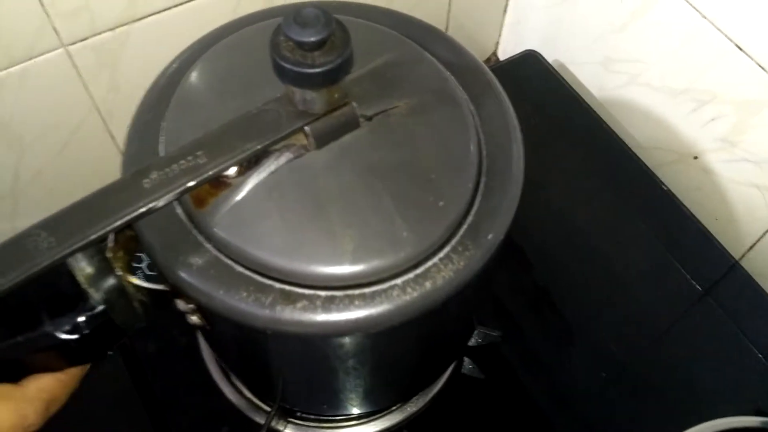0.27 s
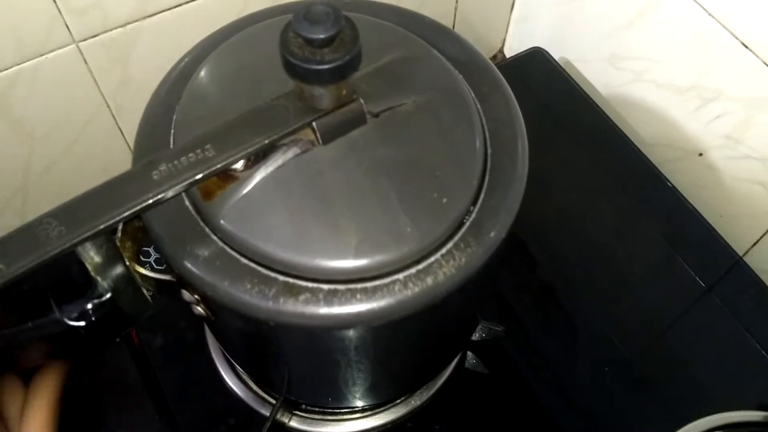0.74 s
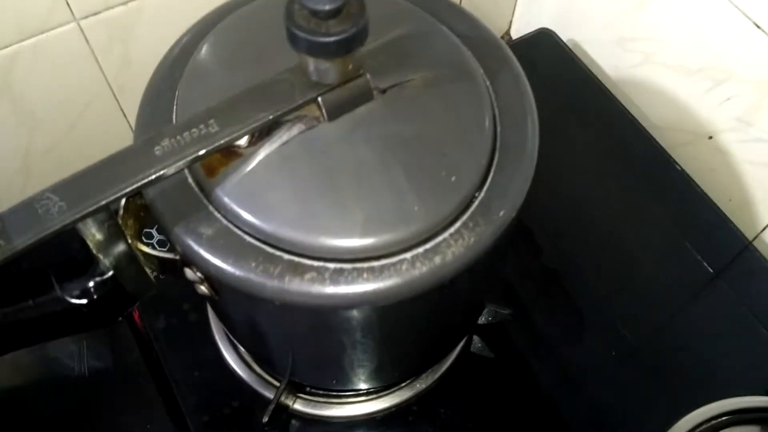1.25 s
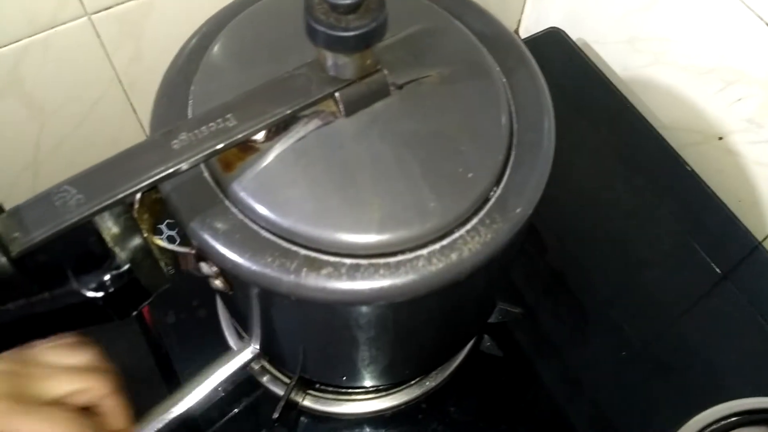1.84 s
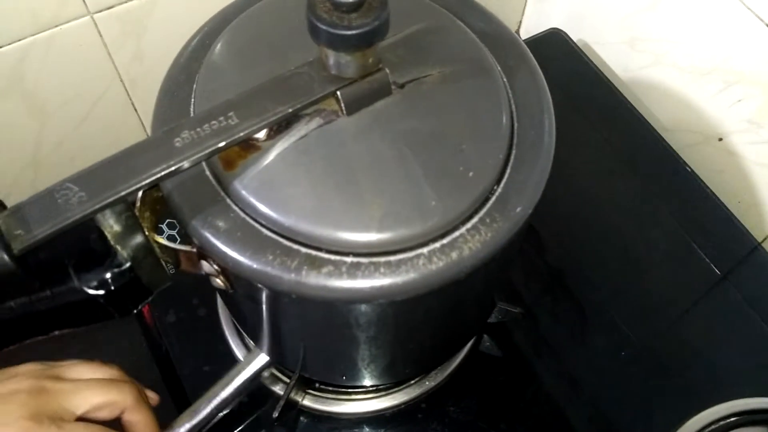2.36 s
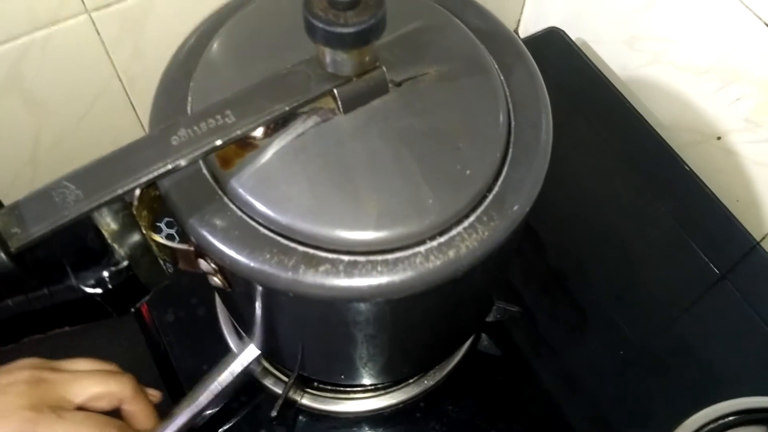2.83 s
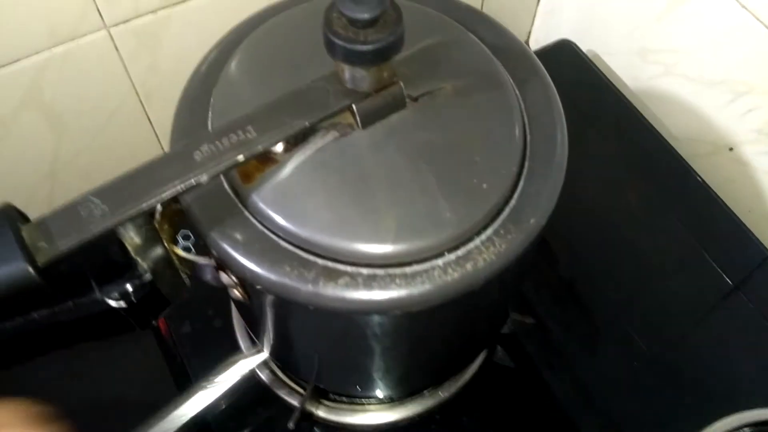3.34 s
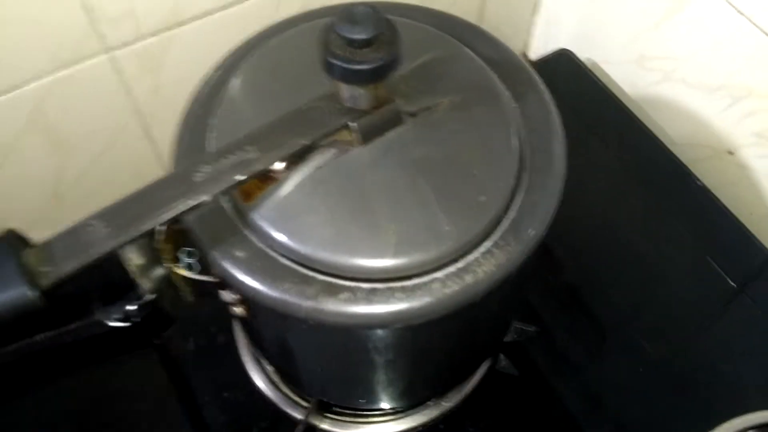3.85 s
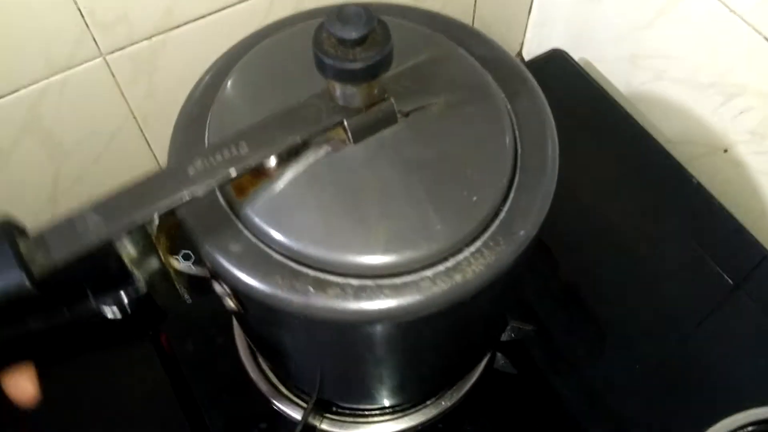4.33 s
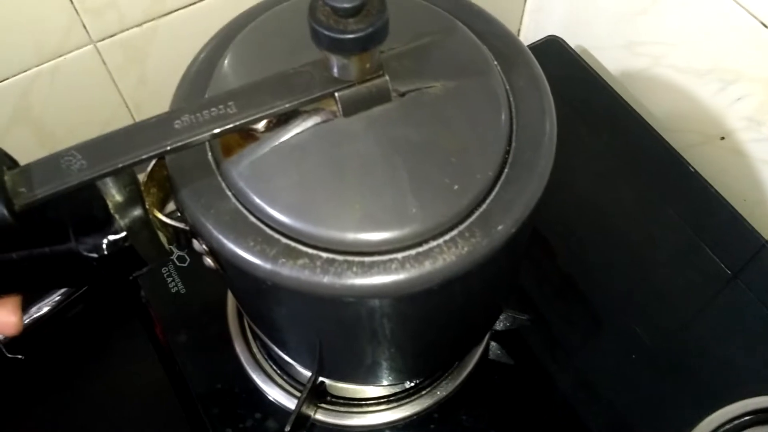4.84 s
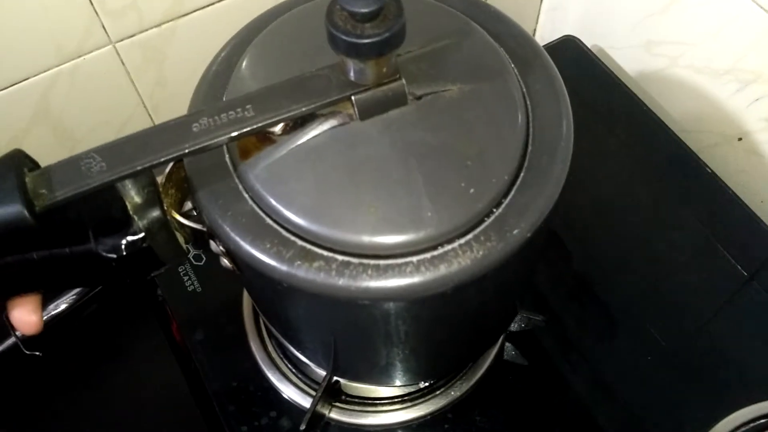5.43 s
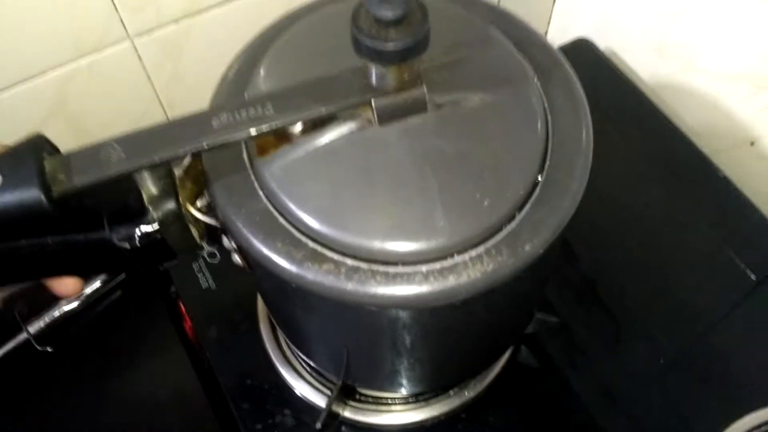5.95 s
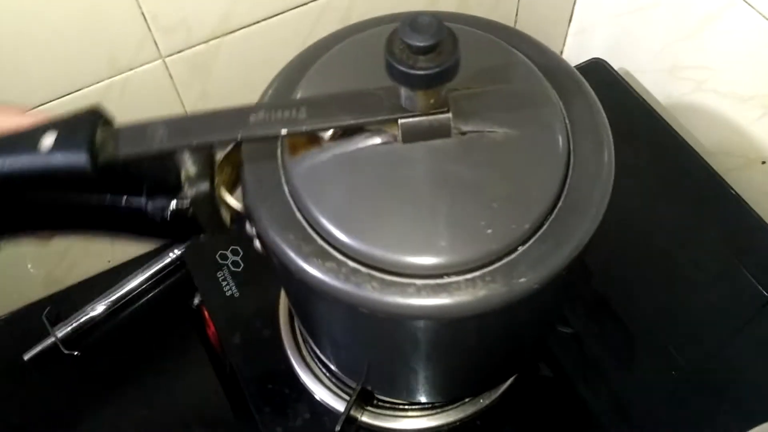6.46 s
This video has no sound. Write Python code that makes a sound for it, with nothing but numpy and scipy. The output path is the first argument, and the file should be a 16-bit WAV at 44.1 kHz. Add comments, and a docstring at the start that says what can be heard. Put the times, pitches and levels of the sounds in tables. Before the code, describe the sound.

A steel gas lighter clinks, snaps three times, lights a stove burner with a soft thump, then is set down with a clatter.

```python
"""A steel gas lighter is picked up, snapped three times under a pot on a stove, then laid down.
Each contact is a gritty crack that rings its tube; its wire ring ticks and fizzes.
The gas catches with a thump that shakes the hollow under the pot. The steel echoes in a small
tiled kitchen. Below lie a low room rumble, a murmur of the house and a faint hiss of gas."""
import sys
import numpy as np
from scipy import signal
from scipy.io import wavfile

SR = 44100
rng = np.random.default_rng(int(sys.argv[2]) if len(sys.argv) > 2 else 0)


def dump(signal):
    """Clip the signal to [-1, 1] and save it as 16-bit WAV at the path in sys.argv[1]."""
    limited = np.clip(np.atleast_2d(signal).T, -1, 1)
    pcm = np.round(limited * 32767).astype(np.int16)
    wavfile.write(sys.argv[1], SR, pcm)


N = 295029


def from_db(db):
    """Gain of a level in dB."""
    return 10 ** (np.asarray(db) / 20)


def unit_rms(x):
    """Scale to rms 1."""
    return x / np.sqrt(np.mean(x ** 2) + 1e-20)


def at_hz(table, hz, column=1):
    """Interpolate a table over log frequency."""
    table = np.array(table)
    return np.interp(np.log(hz), np.log(table[:, 0]), table[:, column])


def band(x, low_hz, high_hz, order=2):
    """Band-pass that keeps the rms of white noise."""
    sections = signal.butter(order, [low_hz, high_hz], "band", fs=SR, output="sos")
    return signal.sosfilt(sections, x) * np.sqrt(SR / 2 / (high_hz - low_hz))


def drift(rate_hz):
    """Slow random curve through unit-variance knots."""
    knots = rng.standard_normal(400)
    return np.interp(np.arange(N) / SR * rate_hz, np.arange(len(knots)), knots)


def coloured_noise(spectrum, waver_db):
    """Narrow noise bands under a spectrum, each wavering in level; rms 1."""
    edges_hz = np.geomspace(spectrum[0][0], spectrum[-1][0], num=25)
    white = rng.standard_normal((2, N))
    out = 0
    for k, (low_hz, high_hz) in enumerate(zip(edges_hz, edges_hz[1:])):
        density_db = at_hz(spectrum, np.sqrt(low_hz * high_hz)) + waver_db * drift(rate_hz=9.1)
        out += from_db(density_db) * np.sqrt(high_hz - low_hz) * band(white[k % 2], low_hz, high_hz)
    return unit_rms(out)


# tones in the murmur: f/Hz, width/Hz, level/dB
HUMS = [(238.3, 10, -5), (528, 13, -3.5), (830, 15, -7.5)]


def hums():
    """Noise through narrow resonances gives wavering tones."""
    out, white = 0, rng.standard_normal(N)
    for hz, width_hz, level_db in HUMS:
        r, w = np.exp(-np.pi * width_hz / SR), 2 * np.pi * hz / SR
        tone = signal.lfilter([1, 0, -1], [1, -2 * r * np.cos(w), r * r], white)
        out += from_db(level_db) * unit_rms(tone)
    return out


# background envelope: t/s, rumble level/dB, hiss level/dB
BACKGROUND_LEVELS = [(0, -68.5, -83.5), (.6, -68.5, -78), (1.25, -62, -79), (1.9, -61, -67.5),
                     (2.298, -70, -68.5), (3.0, -71, -66.5), (3.7, -73, -73.5), (5.3, -70, -72),
                     (5.7, -70.5, -71.5), (6.69, -69, -71.5)]
# noise spectra: f/Hz, relative density/dB
RUMBLE_SPECTRUM = [(15, -22.5), (27, -15.5), (50, -5), (87, -0.5), (140, -5), (209, -14.5), (330, -24.5),
                   (430, -54)]
MURMUR_SPECTRUM = [(200, -20), (280, -8.5), (450, -9.5), (1000, -15), (1400, -17), (3000, -22.5),
                   (3800, -37)]
HISS_SPECTRUM = [(2200, -46), (2600, -26), (4050, -18.5), (5200, -20.5), (5800, -10), (6400, -19),
                 (8640, -17.5), (10600, -8), (11800, -14.5), (13100, -3.5), (14200, -6), (15600, -14),
                 (16400, -26)]


def background():
    """Room rumble, a murmur of the house that swells with it, and the hiss of gas."""
    times_s, *levels_db = np.transpose(BACKGROUND_LEVELS)
    rumble_db, hiss_db = (np.interp(np.arange(N) / SR, times_s, column) for column in levels_db)
    murmur_db = -79 + 0.85 * (rumble_db - rumble_db.mean())
    rumble = from_db(rumble_db) * coloured_noise(RUMBLE_SPECTRUM, waver_db=1.5)
    murmur = from_db(murmur_db) * (coloured_noise(MURMUR_SPECTRUM, waver_db=3.5) + hums())
    hiss = from_db(hiss_db) * coloured_noise(HISS_SPECTRUM, waver_db=1.5)
    return rumble + murmur + hiss


# room tail: f/Hz, t60/s, level/dB
KITCHEN_TAIL = [(300, 0.13, -6.5), (790, 0.14, -3.5), (2100, .16, -6), (4300, 0.16, -10),
                (6700, 0.33, -4.5), (9700, 0.13, -12), (12500, 0.18, -2), (16000, 0.12, -4)]


def kitchen_echoes(x, first_echo_s=0.0068):
    """Dense echoes off the tiles: a noise tail that dies band by band."""
    t = np.arange(SR // 2) / SR
    edges_hz = np.geomspace(150, 18000, num=11)
    tail = 0
    for low_hz, high_hz in zip(edges_hz, edges_hz[1:]):
        hz = np.sqrt(low_hz * high_hz)
        decay = from_db(-60 * t / at_hz(KITCHEN_TAIL, hz)) * (t > first_echo_s)
        gain = from_db(at_hz(KITCHEN_TAIL, hz, column=2)) * np.sqrt((high_hz - low_hz) / (SR / 2))
        noise = band(rng.standard_normal(len(t)), low_hz, high_hz)
        tail += gain * noise * decay / np.sqrt(np.sum(decay ** 2))
    return signal.fftconvolve(x, tail)[:N]


def resonate(force, modes, levels_db):
    """A force drives damped modes (f/Hz, t60/s)."""
    out = 0
    for (hz, t60_s), level_db in zip(modes, levels_db):
        r, w = from_db(-60 / (t60_s * SR)), 2 * np.pi * hz / SR
        gain = from_db(level_db) * np.sin(w)
        out += signal.lfilter([0, gain], [1, -2 * r * np.cos(w), r * r], force + 1e-18)
    return out


def bursts(times_s, levels_db, rises_ms, decays_ms, grit_db=1.5):
    """Gritty noise bursts; the level jumps about once a millisecond, as in a slipping contact."""
    out, t_ms = np.zeros(N), np.arange(12000) / SR * 1000
    for at_s, level_db, rise_ms, decay_ms in zip(times_s, levels_db, rises_ms, decays_ms):
        attack = (1 - np.exp(-t_ms / np.clip(rise_ms, .2, 30))) ** 2
        shape = attack * np.exp(-t_ms / np.clip(decay_ms, .3, 60))
        grit = from_db(grit_db * np.repeat(rng.standard_normal(len(t_ms) // 40), 40))
        noise = grit * rng.standard_normal(len(t_ms))
        start = round(at_s * SR) - 40
        out[start:start + len(t_ms)] += from_db(level_db) * shape / shape.max() * noise
    return out


# air pushes, loudest as the gas catches: t/s, level/dB, length/ms
PUSHES = [(2.061, -48, 16.0), (2.624, -42, 12), (3.066, -25.5, 3.6), (3.082, -23, 2.5), (3.221, -41, 5.0)]
# air modes under the pot: f/Hz, level/dB, t60/s
HOLLOW_MODES = [(67.49, -9, 0.028), (123.5, -3.5, 0.3), (145, -2, 0.095), (173, -2.5, 0.079),
                (230.6, -17.5, 0.29), (546.7, -16.5, .08)]


def gas_thumps():
    """Soft pushes of air and the young flame's flutter ring the hollow under the pot."""
    push = np.zeros(N)
    for at_s, level_db, length_ms in PUSHES:
        pulse = np.hanning(round(length_ms * SR / 1000))
        push[round(at_s * SR):][:len(pulse)] += from_db(level_db) * pulse / pulse.sum()
    flare = bursts(times_s=[3.068], levels_db=[-42.5], rises_ms=[8.0], decays_ms=[28.3])
    flutter = band(flare, 60, 420)
    hz, mode_db, t60_s = np.transpose(HOLLOW_MODES)
    return flutter + resonate(push + from_db(-31.5) * flutter, zip(hz, t60_s), mode_db)


# wire contacts: t/s, level/dB, decay/ms
WIRE_TICKS = [(.495, -63, 8), (0.684, -41, 19), (.841, -36, 6.8), (1.147, -39, 58), (1.332, -32.5, 8.7),
              (1.352, -32, 10), (1.490, -54, 4.4), (1.784, -21.5, 4.3), (3.564, -38.5, 8.7),
              (3.590, -44, 6.5), (3.914, -27.5, 16), (4.012, -37.5, 12), (4.708, -41, 8.3),
              (5.796, -42, 5.2), (6.075, -31.5, 18), (6.34, -28, 5.7)]
WIRE_RUBS = [(.400, -32.5, 18), (1.709, -46, 96), (3.696, -56.5, 14.8), (6.324, -43, 9.8),
             (6.350, -45.5, 30)]
WIRE_MODES = [(8800, .035), (10200, .015), (13900, .02), (14090, .028), (14250, .02), (15300, .015)]   # f/Hz, t60/s
WIRE_MODE_DB = [-22.5, -28, -6.5, 4.5, -6, -12]   # level/dB per mode
FIZZ_BANDS = [(12000, 15800), (5000, 6300)]   # low f/Hz, high f/Hz
FIZZ_BAND_DB = [-13, -26.5]   # level/dB per band


def wire_ring(tick_rise_share=0.13, rub_rise_ms=13, tick_fizz_db=-12.5, rub_fizz_db=4):
    """Thin high ticks in a fizz of countless tiny modes; rubs are more fizz than tone."""
    rows = [(s, db, tick_rise_share * ms, ms, tick_fizz_db) for s, db, ms in WIRE_TICKS]
    rows += [(s, db, rub_rise_ms, ms, rub_fizz_db) for s, db, ms in WIRE_RUBS]
    times_s, level_db, rise_ms, decay_ms, fizz_db = np.transpose(rows)
    force = bursts(times_s, level_db - 10 * np.log10(decay_ms) - 22, rise_ms, decay_ms)
    out = resonate(band(force, 7000, 20000), WIRE_MODES, WIRE_MODE_DB)   # light taps carry no lows
    for (low_hz, high_hz), band_db in zip(FIZZ_BANDS, FIZZ_BAND_DB):
        fizz = bursts(times_s, level_db + fizz_db + band_db, rise_ms, decay_ms)
        out += band(fizz, low_hz, high_hz, order=5)
    return out


# striker snaps: t/s, level/dB, low cut/dB
SNAPS = [(2.063, 3, -1), (2.626, -1, 2), (3.058, -1.5, -2)]
# knocks on steel, duller taps held in the fist: t/s, level/dB, decay/ms, low cut/dB, ring/dB
KNOCKS = [(.146, -38, 4.4, 6, -10), (.156, -10.5, 2.9, 20, -23), (.38, -5.5, 4.6, 21, -16.5),
          (.718, -35.5, 4.7, 14, -23), (.9, -33, 4.8, 42, -20), (.908, -12.5, 5.9, 42, -11.5),
          (.981, -31.5, 3, 41, -2), (1.046, -26, 5.5, 36, -1), (1.086, -15, 3.7, 41.5, -3.5),
          (1.219, -55, 4, 30, -9), (1.239, -34.5, 3.7, 48, -18), (1.402, -33.5, 11.7, 19, -34),
          (1.445, -45, 4.9, 26, -11), (1.781, -22.5, 8, 30.5, -12), (1.892, -12.5, 7, 4, -21),
          (2.408, -35, 3, 4, -22), (2.415, -23, 4.6, 5.5, -3.5), (2.441, -28.5, 8.2, 0, -9.5),
          (2.77, -33, 3, 47, -11), (2.799, -23.5, 8.6, 11.5, -2.5), (2.904, -24.5, 7.1, 6, -2.5),
          (3.208, -21.5, 7.6, 12, -11.5), (3.336, -46.5, 3, 15, -9), (3.746, -9.5, 6, 22, -22.5),
          (3.774, -6, 5.4, 41.5, 1), (3.792, -10, 7.2, 26.5, -11.5), (3.856, -24, 5.6, 29, -23),
          (3.884, -27, 4.8, 45, -3.5), (3.977, -39, 6.6, 48, -10)]
TAPS = [(.576, -39.5, 3.9, 19, -28), (.676, -29.5, 4.2, 0, -28), (.779, -36, 4.4, 0, -24),
        (2.246, -50, 6.8, 26, -1.5), (2.274, -36.5, 11, 3, -1.5), (3.310, -52.5, 3.7, 19, -14),
        (6.012, -46.5, 4.1, -8.5, -20), (6.019, -63.5, 35, 2.5, -20)]
# slides along steel: t/s, level/dB, decay/ms, low cut/dB
SLIDES = [(.935, -37, 37, 31), (1.120, -43, 31, 20), (1.929, -31.5, 35.7, 1), (2.465, -37, 13, 2.5),
          (2.945, -37.5, 8.7, 2.5), (3.811, -23.5, 27.7, 27)]
# contact spectra: relative level/dB per crack band
SNAP_DB = [-37.5, -27.5, -21.5, -12, -5]
KNOCK_DB = [-12.5, -11, -17, -19, -7]
TAP_DB = [-33.5, -13, -9, -15.5, -20.5]
SLIDE_DB = [-15.5, -18.5, -24.5, -17, -7]
LOW_CUT_WEIGHTS = [1.7, .9, 0.28, -0.028, 0.092]   # factor on the low cut per crack band
CRACK_BANDS = [(400, 1000), (1000, 2500), (2500, 5000), (5500, 10000), (10000, 17000)]   # low f/Hz, high f/Hz
TUBE_MODES = [(950, .05), (1180, .03), (1450, .04), (1620, .04), (3570, .05), (3700, .03), (7450, .05),
              (9100, .03), (10500, .03), (10780, .04), (12940, .04), (13600, .045), (13830, .045)]   # f/Hz, t60/s
TUBE_MODE_DB = [-4, -13.5, -7, -8.5, -4.5, 4.5, -13.5, -13, -6.5, -6.5, -12.5, -9, -5]   # level/dB per mode


def lighter(snap_decay_ms=1.9, snap_ring_db=-21.5, slide_ring_db=-10):
    """Each contact cracks with its own spectrum and rings the hand-damped steel tube."""
    snap_rise, knock_rise, slide_rise = 0.31, 0.33, 0.47   # shares of the decay time
    rows = [(s, db, snap_decay_ms, cut, snap_ring_db, snap_rise, *SNAP_DB) for s, db, cut in SNAPS]
    rows += [(*knock, knock_rise, *KNOCK_DB) for knock in KNOCKS]
    rows += [(*tap, knock_rise, *TAP_DB) for tap in TAPS]
    rows += [(*slide, slide_ring_db, slide_rise, *SLIDE_DB) for slide in SLIDES]
    times_s, level_db, decay_ms, cut_db, ring_db, rise_share, *colour_db = np.transpose(rows)
    rise_ms = rise_share * decay_ms
    bands_db = level_db + colour_db - np.outer(LOW_CUT_WEIGHTS, cut_db)
    drive_db = ring_db - 10 * np.log10(decay_ms) - 18.5   # offsets the energy of longer contacts
    crack = force = 0
    for (low_hz, high_hz), band_db in zip(CRACK_BANDS, bands_db):
        crack += band(bursts(times_s, band_db - 5, rise_ms, decay_ms), low_hz, high_hz, order=3)
        force += band(bursts(times_s, band_db + drive_db, rise_ms, decay_ms), low_hz, high_hz)
    return crack + resonate(force, TUBE_MODES, TUBE_MODE_DB)


def scene():
    """Steel and its echoes over thumps and background; mono."""
    steel = lighter() + wire_ring()
    return (steel + kitchen_echoes(steel) + gas_thumps() + background())[None]


def record(dry):
    """Microphone: treble roll-off, rounded peaks, bass roll-off, then a steep low-pass."""
    bottom_hz, top_hz, cutoff_hz = 44.85, 16000, 16984
    top_drop_db, ceiling = 30, 0.95
    heard = signal.sosfilt(signal.cheby2(10, top_drop_db, top_hz, fs=SR, output="sos"), dry)
    heard = ceiling * np.tanh(heard / ceiling)
    heard = signal.sosfilt(signal.butter(2, bottom_hz, "high", fs=SR, output="sos"), heard)
    return signal.sosfilt(signal.cheby2(12, 70, cutoff_hz, fs=SR, output="sos"), heard)


dry = scene()
out = record(dry)
dump(out)
```